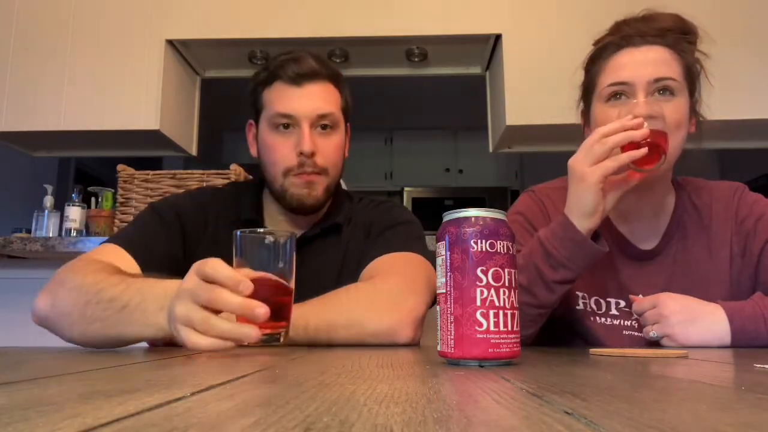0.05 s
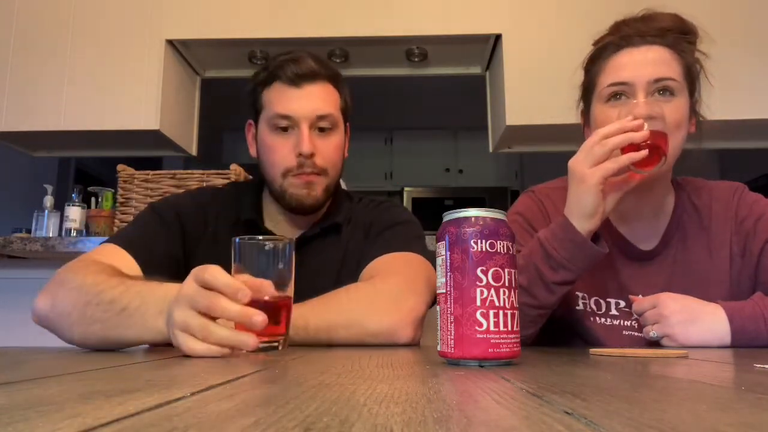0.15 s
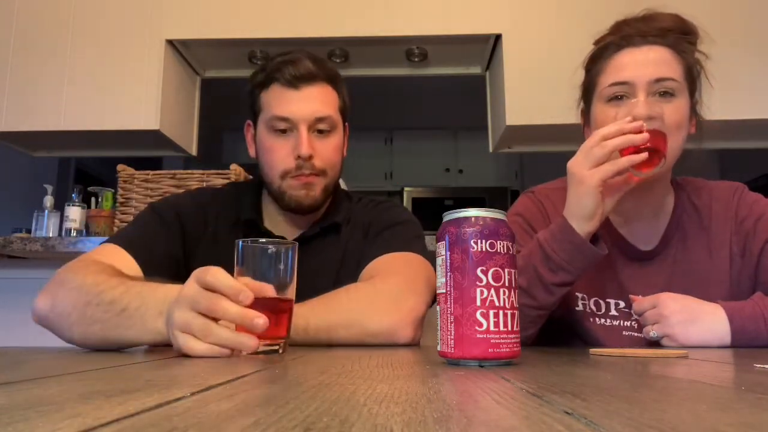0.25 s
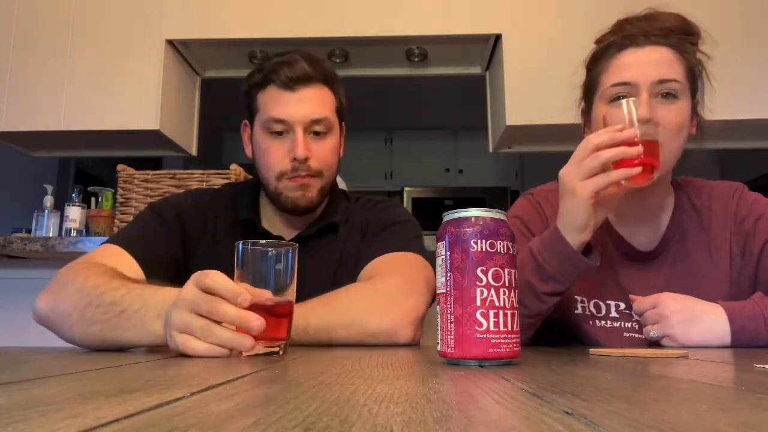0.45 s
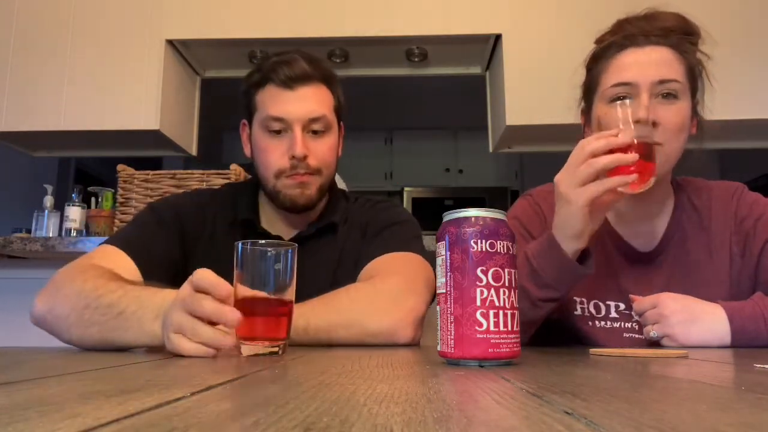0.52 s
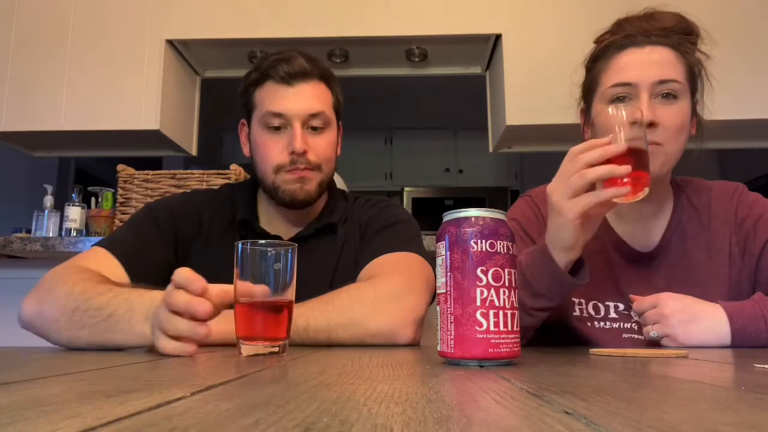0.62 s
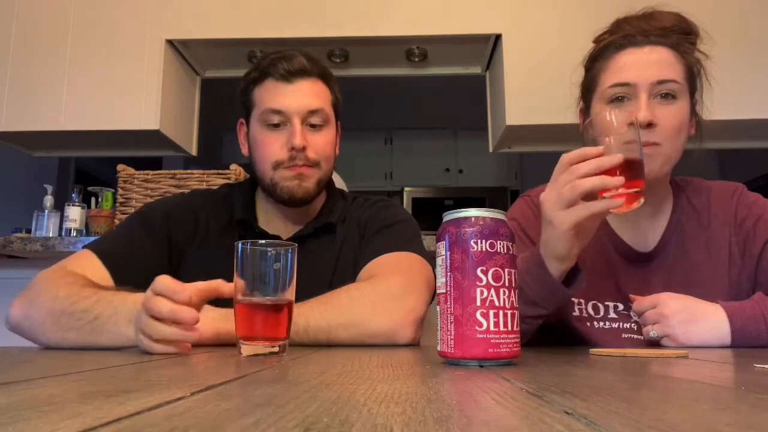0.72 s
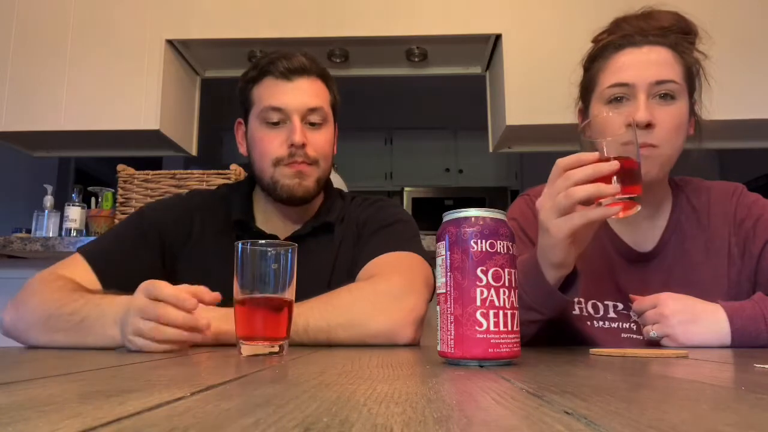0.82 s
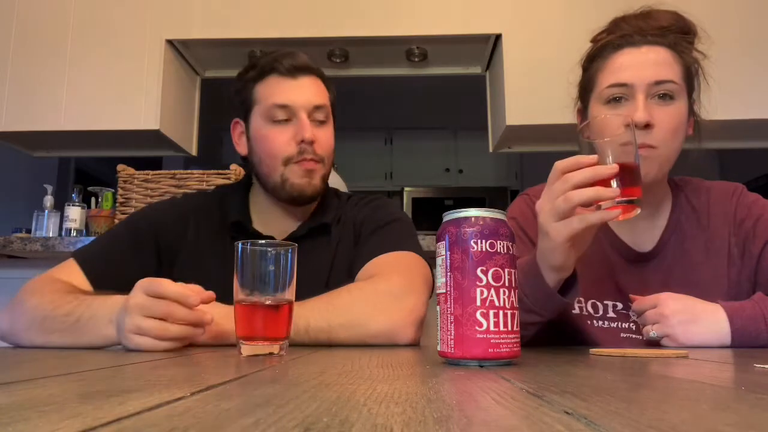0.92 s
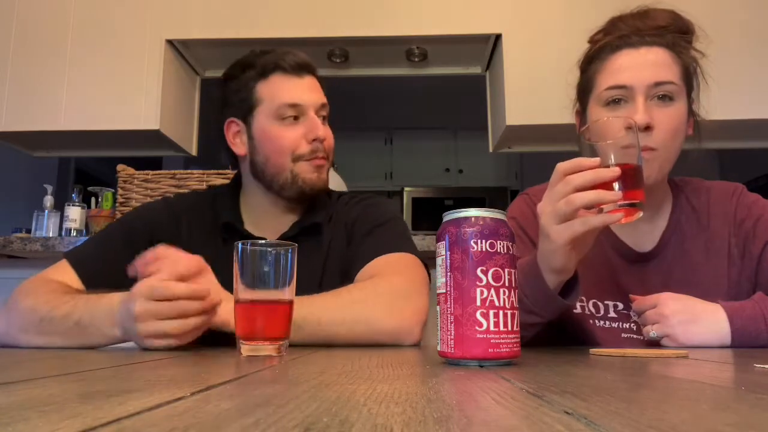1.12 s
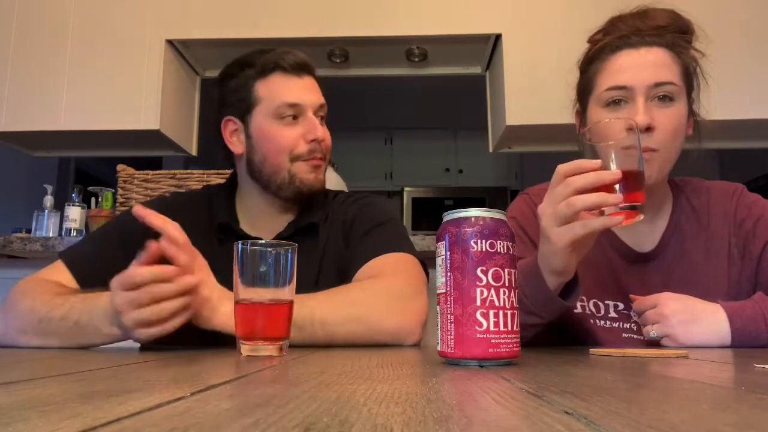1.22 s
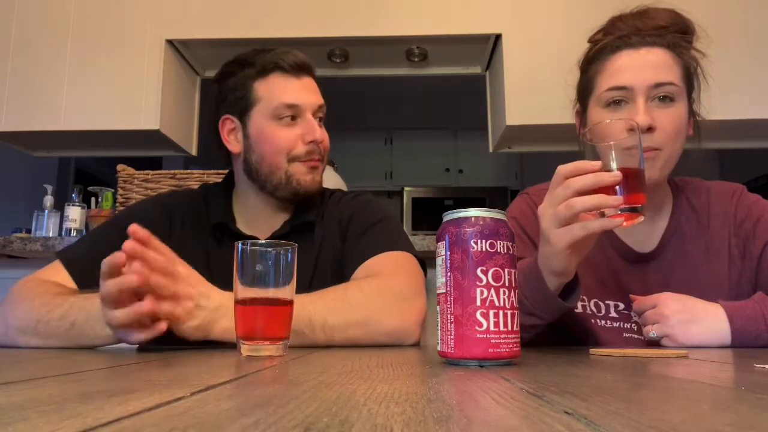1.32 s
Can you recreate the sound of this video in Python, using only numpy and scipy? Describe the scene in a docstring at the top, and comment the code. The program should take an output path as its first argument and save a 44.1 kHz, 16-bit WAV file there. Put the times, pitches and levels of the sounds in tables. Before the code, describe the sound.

A drinking glass is set down firmly on a wooden table, then faint hand rubbing and taps.

```python
"""A kitchen: a glass is set down on a wooden table, left of a microphone standing on the same table.
The top carries the blow as a falling chirp, returns it from its edges, rings in decaying modes and fills the
room with a noise tail. Small taps are short decaying tones; a soft knuckle follows the glass as two faint blows.
A hand slides over the wood in two strokes of patchy noise, with a squeak of falling pitch, a puff of noise and
later a faint high brush. A low rumble of filtered noise lies under it all."""
import sys
import numpy as np
from scipy import signal
from scipy.fft import rfft, irfft, next_fast_len
from scipy.io import wavfile
from scipy.ndimage import uniform_filter1d

SR = 44100
rng = np.random.default_rng(int(sys.argv[2]) if len(sys.argv) > 2 else 0)


def pcm_store(signal):
    """Save signal as 16-bit PCM."""
    levels = np.round(np.clip(np.atleast_2d(signal), -1, 1) * 32767)
    wavfile.write(sys.argv[1], SR, levels.astype(np.int16).T)


N = 59535  # length in samples


def amp(db):
    """Decibels to a linear gain."""
    return 10 ** (np.asarray(db) / 20)


def unit(x):
    """Scale x to an rms of 1."""
    return x / np.sqrt(np.mean(x ** 2) + 1e-20)


def along(points, hz):
    """Read (freq_hz, value) points on a log frequency axis."""
    point_hz, value = np.transpose(points)
    return np.interp(np.log(hz + 1), np.log(point_hz + 1), value)


def level(rows):
    """Gain per sample from (time_s, level_db) rows, practically silent outside them."""
    time_s, level_db = np.transpose(rows)
    return amp(np.interp(np.arange(N) / SR, time_s, level_db, left=-150, right=-150))


def since(start_s):
    """Seconds after start_s, zero before."""
    return np.maximum(np.arange(N) / SR - start_s, 0)


def filtered(x, response):
    """Filter x by a complex response of frequency, with room for delays."""
    size = next_fast_len(N + SR // 2)
    spectrum = rfft(x, size) * response(np.fft.rfftfreq(size, 1 / SR))
    return irfft(spectrum, size)[..., :N]


# likeness of left and right at the microphone: freq_hz, correlation [-1 to 1]
SIDE_LIKENESS = [(60, 0.52), (290, 0.76), (620, -0.1), (2000, -0.0049), (5000, -0.28)]


def spread(pair, colour):
    """Mix two unrelated signals as mid and side, so left and right are as alike as the table says."""
    def mid_side_gains(hz):
        angle = np.arccos(np.clip(along(SIDE_LIKENESS, hz), -1, 1)) / 2
        return amp(along(colour, hz)) * [np.cos(angle), np.sin(angle)]

    mid, side = filtered(pair, mid_side_gains)
    return np.array([mid + side, mid - side])


PATCHY_DB = 1.3  # rms of the random gain


def rush(colour):
    """Stereo noise of rms 1 whose gain varies in patches of time and frequency."""
    noise = signal.stft(rng.standard_normal((2, N)), nperseg=512)[2]
    patches = rng.standard_normal(noise.shape[1:])
    patches = uniform_filter1d(patches, size=6, axis=0)
    patches = uniform_filter1d(patches, size=6, axis=1)
    patchy = signal.istft(noise * amp(PATCHY_DB * unit(patches)), nperseg=512)[1]
    return unit(spread(patchy[:, :N], colour))


# colour of the low room rumble: freq_hz, relative level_db per hertz
RUMBLE_COLOUR = [(15, -46.5), (25, -16.5), (84, -5), (138, -16), (203, -5.5), (256, -9), (283, -12.5),
                 (429, -14.5), (569, -14.5), (1010, -20.5), (1480, -35.5), (12000, -56.5), (15600, -79),
                 (22000, -120)]
# course of the rumble: time_s, level_db
RUMBLE_COURSE = [(0, -56), (.4, -55), (.7, -53), (1.0, -55.5), (1.35, -57)]


def rumble():
    """Low room noise, swelling and sinking slightly."""
    return level(RUMBLE_COURSE) * rush(RUMBLE_COLOUR)


# decay of the kitchen: freq_hz, t60_s
ROOM_DECAY = [(60, 1), (250, .38), (700, 0.45), (1500, 0.5), (3000, 0.35), (8000, 0.26)]
# colour of the kitchen's answer: freq_hz, relative level_db
ROOM_COLOUR = [(60, -6.5), (150, -0.5), (300, -1), (700, -5), (1500, -10), (2500, -1.5), (4500, 4),
               (8000, -2)]
ROOM_DELAY_S = 0.002


def room(x):
    """The kitchen's answer: a noise tail in which each frequency dies at its own speed."""
    hz, t, noise = signal.stft(rng.standard_normal((2, SR // 2)), SR, nperseg=256)
    decay_db = -60 * t / along(ROOM_DECAY, hz)[:, None]
    tail_db = along(ROOM_COLOUR, hz)[:, None] + decay_db
    tail = signal.istft(noise * amp(tail_db), SR, nperseg=256)[1]
    tail /= np.linalg.norm(tail[0])
    delayed = np.pad(x, (round(ROOM_DELAY_S * SR), 0))
    wet = signal.fftconvolve(delayed[None], tail, axes=1)
    return spread(wet[:, :N], [(20, 0.012), (20000, 0)])  # practically flat colour


# small ticks: start_s, level_db before the room is added, pitch_hz, t60_s
TAP_TICKS = [(.175, -69.5, 2400, .02), (0.959, -52, 1450, 0.019), (1.045, -46, 1134, 0.021)]


def taps():
    """Each tap is a short, dull, exponentially decaying sine, answered by the room."""
    dry_taps = sum(amp(level_db - 60 * since(start_s) / t60_s) * np.sin(2 * np.pi * pitch_hz * since(start_s))
                   for start_s, level_db, pitch_hz, t60_s in TAP_TICKS)
    return dry_taps + amp(3.5) * room(dry_taps)


LAG_S, LAG_POWER = 0.0021, 1.5  # travel time through the top near 1 kHz; how steeply lower tones lag


def softness(hz, soft_hz):
    """A soft contact excites little above soft_hz."""
    return 1 / (1 + (hz / soft_hz) ** 4)


# colour of the blow: freq_hz, relative level_db per hertz
BLOW_COLOUR = [(35, -56), (60, -14), (150, -11.5), (300, -4), (500, 4), (800, -5.5), (1250, -8),
               (1600, -23.5), (2000, -23), (2600, -32), (3500, -47), (5000, -56), (8000, -70),
               (12000, -82.5), (16000, -110)]


def travelling_blow(start_s, peak_db, soft_hz):
    """An impulse runs through the top, high tones first, and arrives as a falling chirp."""
    def travel(hz):
        power = 1 - LAG_POWER
        # the travel time integrated over frequency gives the phase in cycles
        lag_cycles = 1000 * LAG_S * (((hz + 60) / 1000) ** power - 1) / power
        return np.exp(-2j * np.pi * (hz * start_s + lag_cycles))

    impulse = np.eye(1, N)[0]
    blow = filtered(impulse, lambda hz: amp(along(BLOW_COLOUR, hz)) * softness(hz, soft_hz) * travel(hz))
    return blow * amp(peak_db) / np.abs(blow).max()


GRIT_DB, GRIT_T60_S, GRIT_HZ = -2, 0.02, 1800  # smear relative to the blow, its decay, its low cut


def contact_grit(blow):
    """Uneven contact smears the treble of the blow with a short noise tail on each side."""
    grit = amp(-60 * since(0) / GRIT_T60_S) * rng.standard_normal((2, N))
    smear = signal.fftconvolve(blow[None], grit / np.linalg.norm(grit[0]), axes=1)[:, :N]
    return amp(GRIT_DB) * filtered(smear, lambda hz: 1 / (1 + (GRIT_HZ / (hz + 1)) ** 4))


# modes of the table top: pitch_hz, level_db before the blow's level and RING_DB, t60_s
TOP_MODES = [(54.57, -14.5, 0.72), (129.8, -13.5, 0.54), (189.8, -8.5, .4), (279, 4, 0.22),
             (356.3, -4.5, .35), (431, -14, 0.72), (462, -6, 0.48), (521, 0.5, 0.083), (623.8, 0, 0.23),
             (721.4, -2.5, .19), (849, -4.5, 0.21), (909, -16, 0.46), (1072, -10, .2), (1152, -16.5, .15)]
RING_DB, RING_RISE_S, RING_PAN_DB = -17.5, 0.001, 7.5  # pan is left minus right
RING_WAIT_S = 0.00734  # longest wait of a mode for its tone to arrive


def top_ring(start_s, peak_db, soft_hz):
    """Each mode of the top starts when its tone arrives, rises quickly and decays as a sine."""
    ring = np.zeros((2, N))
    for pitch_hz, mode_db, t60_s in TOP_MODES:
        wait_s = min(LAG_S * ((pitch_hz + 60) / 1000) ** -LAG_POWER, RING_WAIT_S)
        t = since(start_s + wait_s)
        envelope = amp(mode_db - 60 * t / t60_s) * (1 - np.exp(-t / RING_RISE_S))
        phase_cycles = rng.random() + rng.normal(0, 0.12, (2, 1))  # slightly apart left and right
        ring += softness(pitch_hz, soft_hz) * envelope * np.sin(2 * np.pi * (pitch_hz * t + phase_cycles))
    side_db = RING_PAN_DB * np.array([[0.5], [-0.5]])
    return amp(peak_db + RING_DB + side_db) * ring


# blows on the top, the glass and then a soft knuckle:
# start_s (before the travel), peak_db of the bare blow, softness_hz (low-pass)
BLOWS = [(0.226, -2, 15300), (.664, -42, 1097), (0.669, -43, 1000)]
# side of the direct blow: freq_hz, left_minus_right_db
BLOW_PAN = [(60, -0.5), (200, 10), (500, 15), (1250, 6), (2300, 8.5), (8000, 9.5)]
# returns from the edges of the top: delay_s, level_db relative to the direct blow
EDGE_RETURNS = [(.0045, -19), (0.0106, -13), (0.0164, -19)]
ROOM_DB = -5  # the room's answer to the blows


def glass():
    """Each blow crosses the top, returns from its edges, sounds in the room and leaves the table ringing."""
    def edges_and_pan(hz):
        returns = sum(amp(level_db) * np.exp(-2j * np.pi * hz * delay_s) for delay_s, level_db in EDGE_RETURNS)
        return (1 + returns) * amp([0 * hz, -along(BLOW_PAN, hz)])

    out = np.zeros((2, N))
    for start_s, peak_db, soft_hz in BLOWS:
        blow = travelling_blow(start_s, peak_db, soft_hz)
        direct = blow + contact_grit(blow)
        out += filtered(direct, edges_and_pan)
        out += amp(ROOM_DB) * room(blow)
        out += top_ring(start_s, peak_db, soft_hz)
    return out


# first and second stroke of the hand: time_s, level_db before RUB_DB
FIRST_STROKE = [(0.36, -86.5), (0.43, -67.5), (0.494, -64), (0.518, -65), (0.642, -59.5), (0.77, -59.5),
                (0.892, -70.5), (0.895, -73)]
SECOND_STROKE = [(0.89, -83), (0.914, -61), (0.946, -66.5), (0.958, -64.5), (1.064, -65), (1.146, -73),
                 (1.186, -83.5), (1.19, -85)]
# colours of the two strokes: freq_hz, relative level_db per hertz
FIRST_RUB_COLOUR = [(400, -12.5), (750, -4), (1400, -8.5), (2100, -4.5), (2700, -10), (4200, -13.5),
                    (6300, -17.5), (8000, -16.5), (10000, -24), (12000, -26), (14000, -33.5),
                    (15500, -42.5)]
SECOND_RUB_COLOUR = [(400, -28.5), (750, -16), (1200, -2), (2100, -4.5), (3800, -12), (5200, -11),
                     (7600, -11), (10000, -15), (12000, -17), (14000, -22.5), (15500, -34.5)]
RUB_DB = 7  # gain of both strokes
# a faint high brush: time_s, level_db
BRUSH_COURSE = [(1.17, -100), (1.2, -73), (1.25, -75.5), (1.29, -80.5), (1.35, -84)]
# colour of the brush: freq_hz, relative level_db per hertz
BRUSH_COLOUR = [(3000, -28.5), (6000, -9.5), (9000, -1.5), (12000, -8), (15000, -15)]


def hand():
    """Skin rubs over wood: patchy noise under each stroke, then a faint high brush."""
    first = level(FIRST_STROKE) * rush(FIRST_RUB_COLOUR)
    second = level(SECOND_STROKE) * rush(SECOND_RUB_COLOUR)
    return amp(RUB_DB) * (first + second) + level(BRUSH_COURSE) * rush(BRUSH_COLOUR)


SQUEAK_S, SQUEAK_DB, SQUEAK_T60_S = 0.899, -52, 0.11  # start, gain before rise and decay, decay
SQUEAK_FROM_HZ, SQUEAK_TO_HZ, SQUEAK_FALL_S = 15000, 10300, 0.0065  # the fall is a time constant
SQUEAK_WIDTH_HZ = 900  # bandwidth of the random flutter
PUFF_DB, PUFF_T60_S = -59, 0.15  # gain before rise and decay, decay
# colour of the noise with the squeak: freq_hz, relative level_db per hertz
PUFF_COLOUR = [(1200, -21), (2100, 12.5), (3500, -19), (6800, -0.5), (9000, -16), (12000, 8), (15500, -17)]


def squeak():
    """A noisy whistle whose pitch drops fast, in a puff of noise, as the second stroke starts."""
    t = since(SQUEAK_S)
    pitch_hz = SQUEAK_TO_HZ + (SQUEAK_FROM_HZ - SQUEAK_TO_HZ) * np.exp(-t / SQUEAK_FALL_S)
    tone = np.sin(2 * np.pi * np.cumsum(pitch_hz) / SR)
    flutter = unit(filtered(rng.standard_normal(N), lambda hz: np.exp(-(hz / SQUEAK_WIDTH_HZ) ** 2)))
    whistle = amp(SQUEAK_DB - 60 * t / SQUEAK_T60_S) * flutter * tone
    puff = amp(PUFF_DB - 60 * t / PUFF_T60_S) * rush(PUFF_COLOUR)
    rise = 1 - np.exp(-t / 0.0027)  # silent before the start
    return rise * (whistle + puff)


def scene():
    """All sounds on and around the table, added together."""
    return rumble() + taps() + glass() + hand() + squeak()


ONE_PORT_HZ, IN_PHASE_HZ = 6700, 7450  # crossover to one shared signal; where both sides are in phase
LEAD_S = 0.000187  # lead of the right side in the treble, as a slope of phase
STRAY = 0.12  # share of the treble that each side keeps of its own
TOP_HZ = 15400  # band limit


def record(dry):
    """Above a crossover both sides carry nearly the same signal, turned in phase; then the band limit."""
    def shared(hz):
        return (1 - STRAY) / (1 + (ONE_PORT_HZ / (hz + 1)) ** 16)

    def turned(hz):
        # half of the phase difference goes to each side
        return np.exp(1j * np.pi * LEAD_S * (hz - IN_PHASE_HZ) * np.array([[-1], [1]]))

    own = filtered(dry, lambda hz: (1 - shared(hz)) * turned(hz) ** (hz > ONE_PORT_HZ))
    common = filtered(dry[0], lambda hz: shared(hz) * turned(hz))
    return filtered(own + common, lambda hz: hz < TOP_HZ)


dry = scene()
out = record(dry)
pcm_store(out)
```